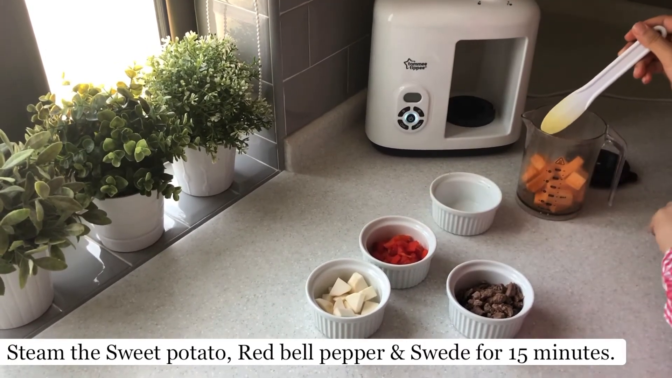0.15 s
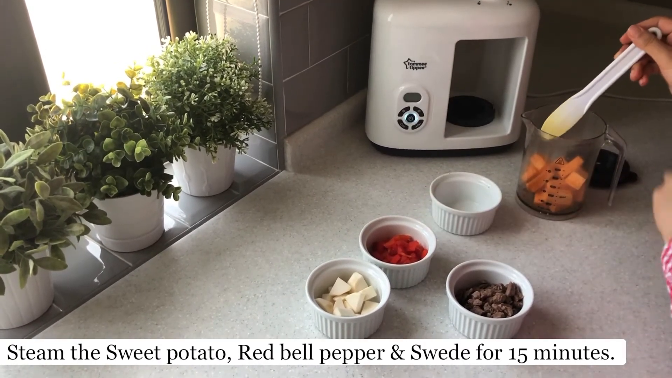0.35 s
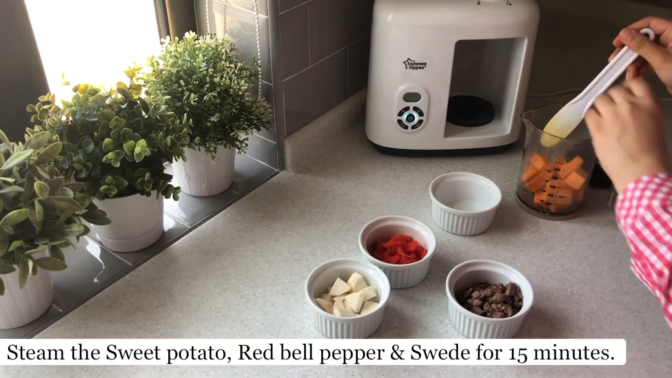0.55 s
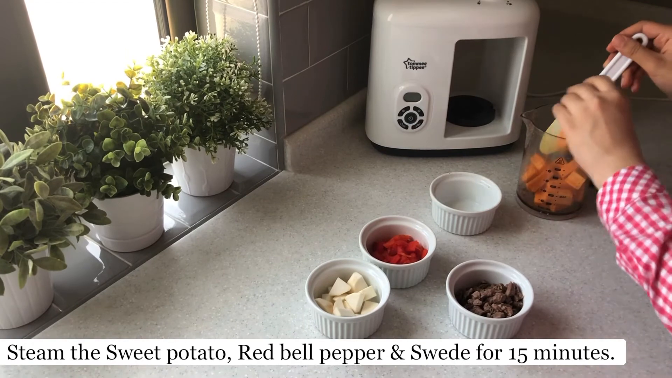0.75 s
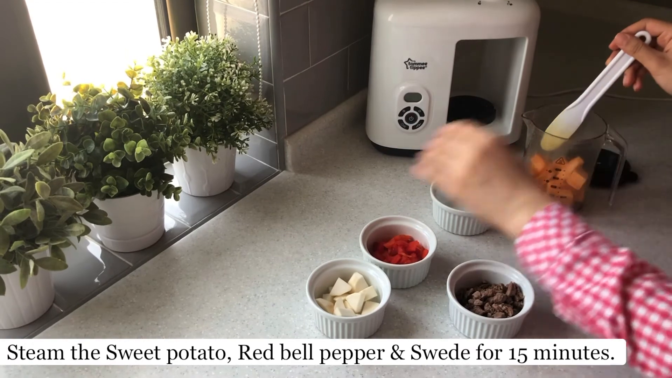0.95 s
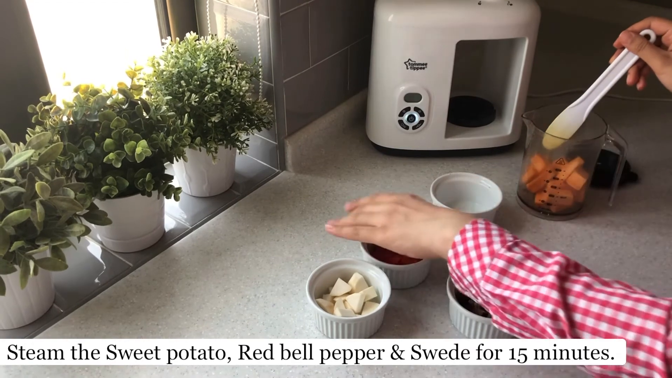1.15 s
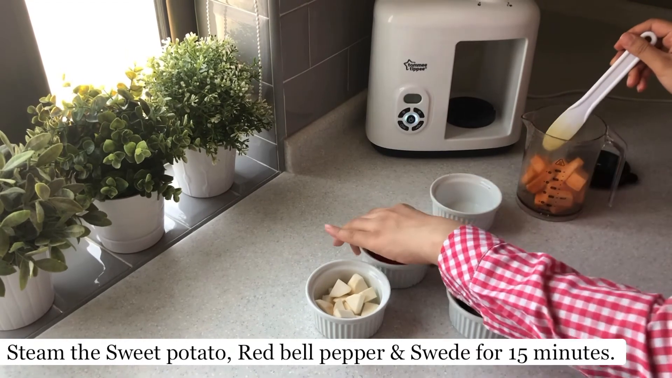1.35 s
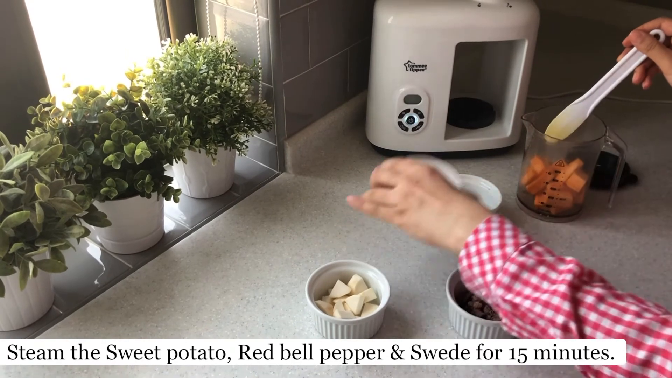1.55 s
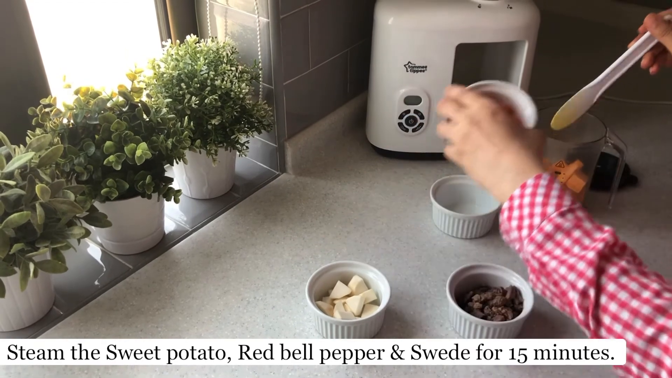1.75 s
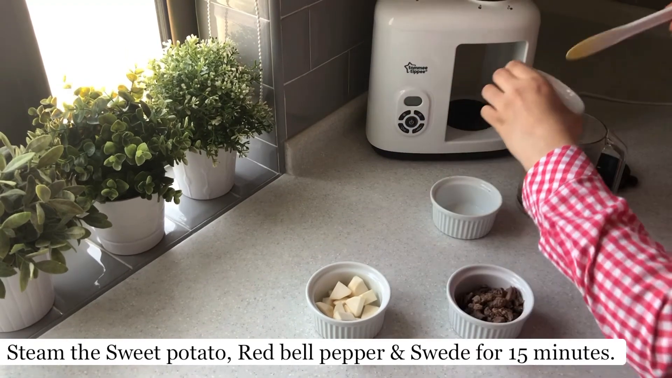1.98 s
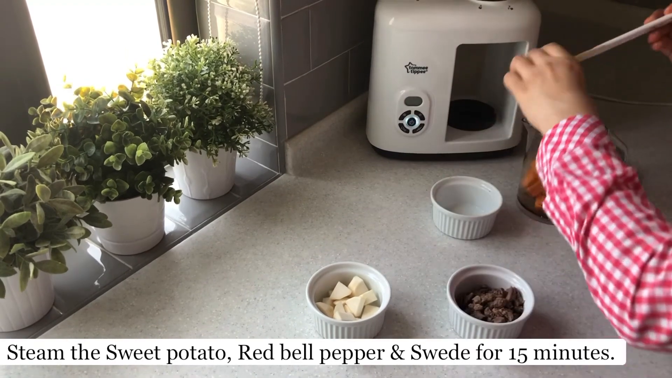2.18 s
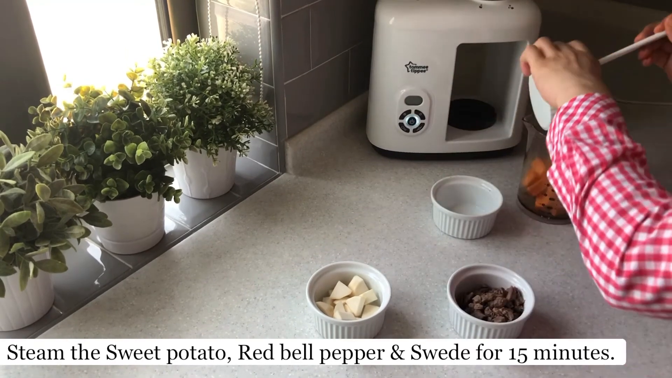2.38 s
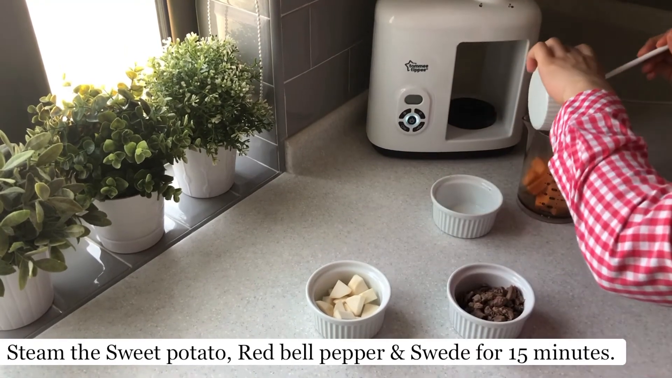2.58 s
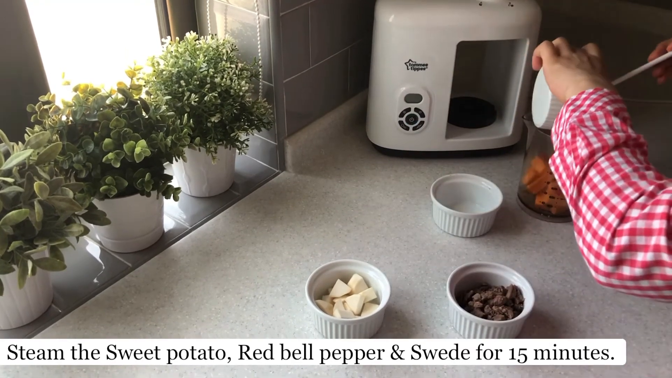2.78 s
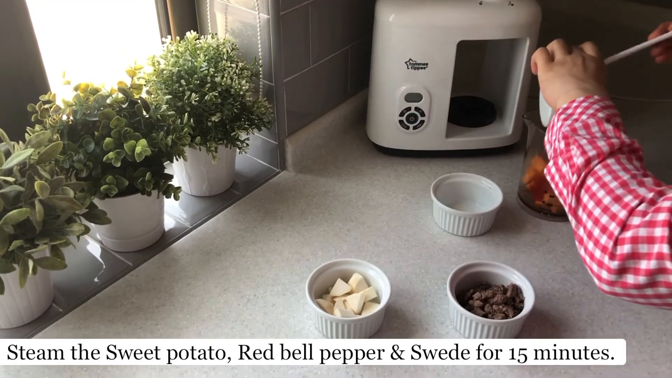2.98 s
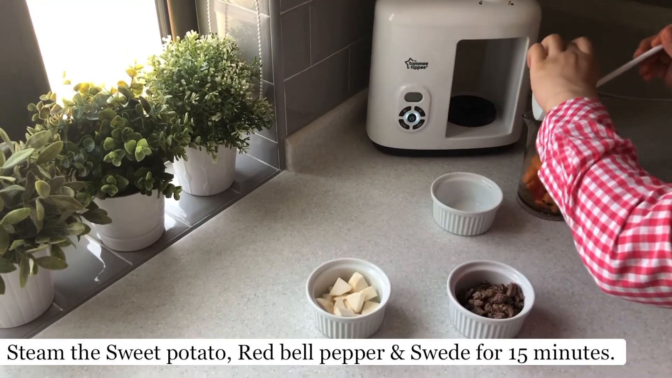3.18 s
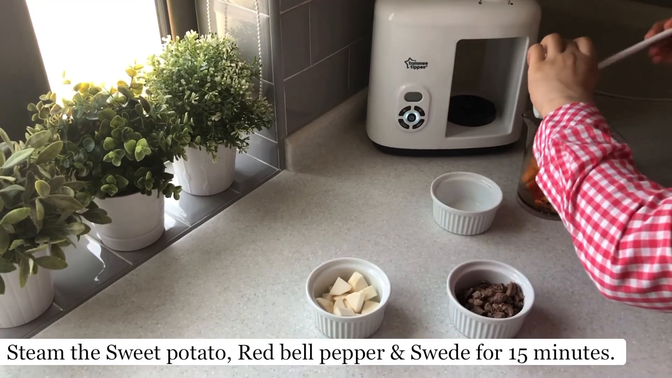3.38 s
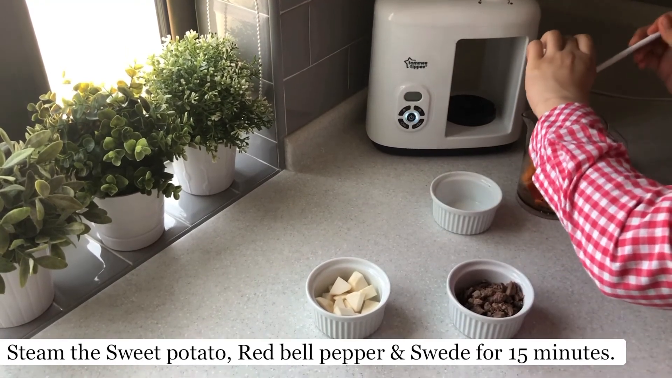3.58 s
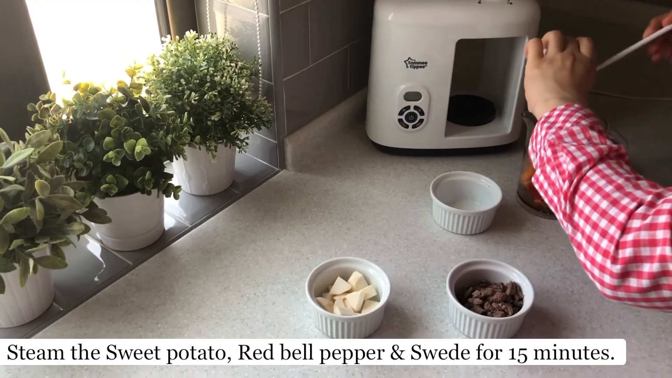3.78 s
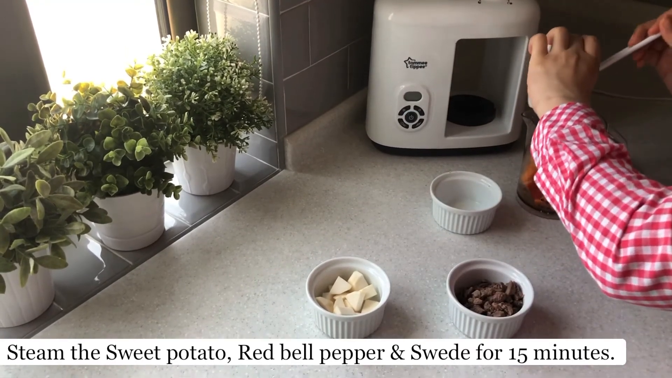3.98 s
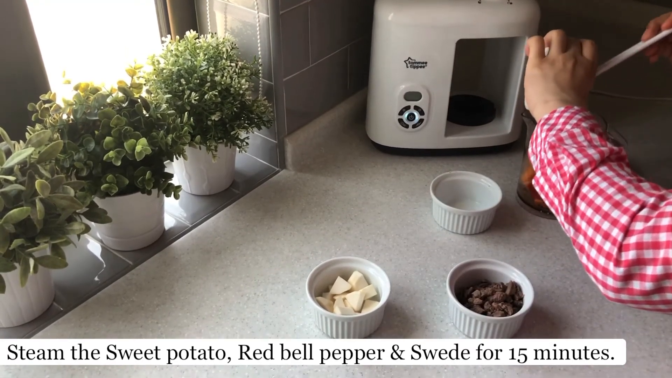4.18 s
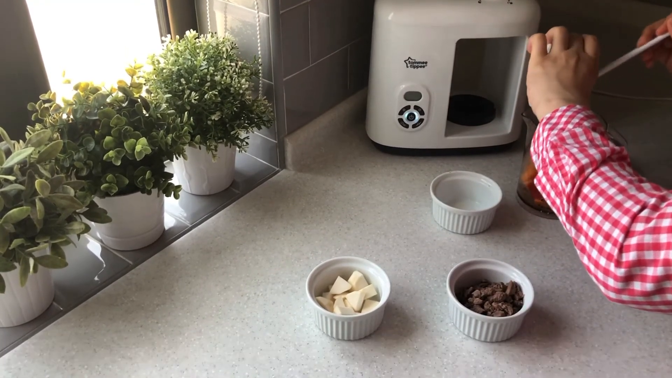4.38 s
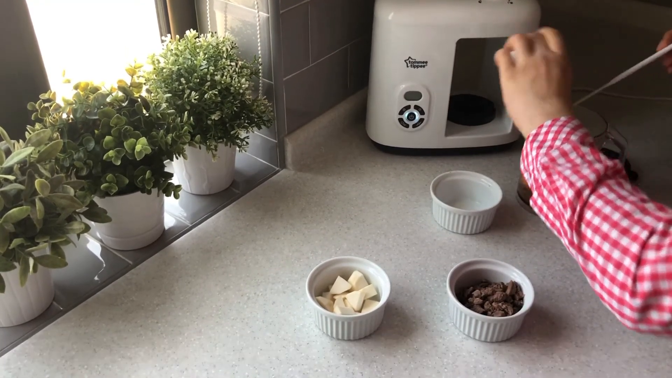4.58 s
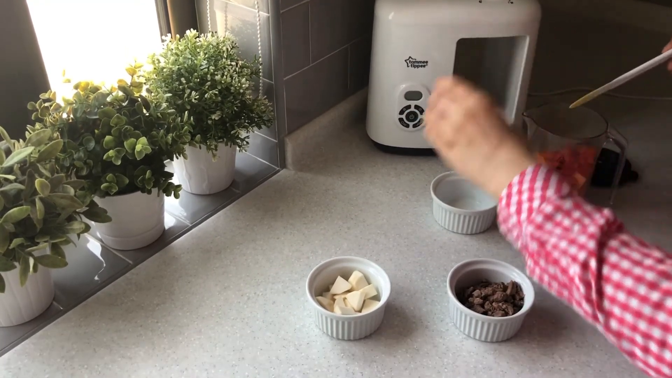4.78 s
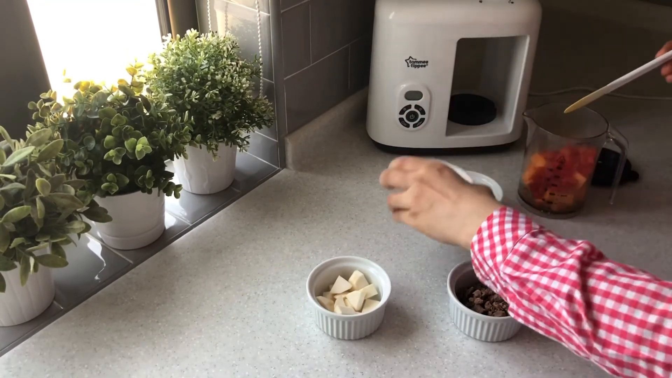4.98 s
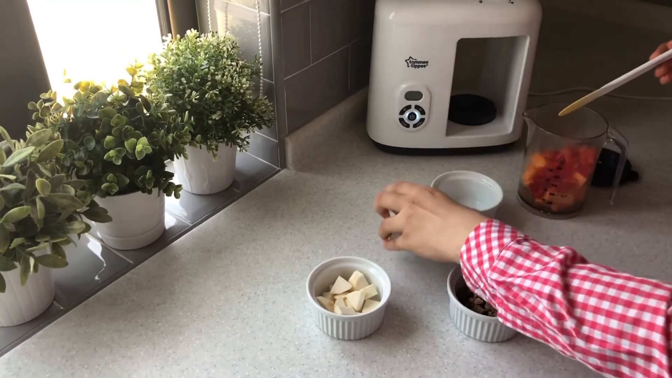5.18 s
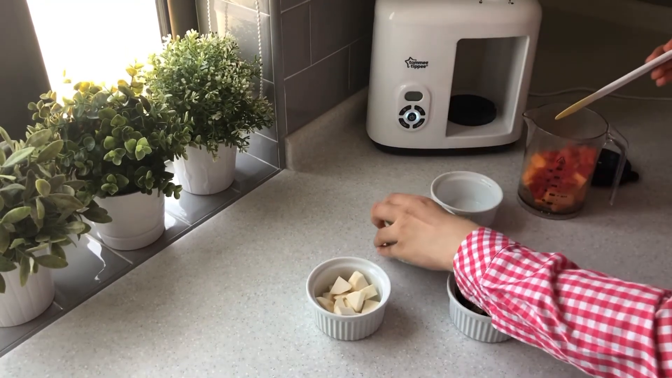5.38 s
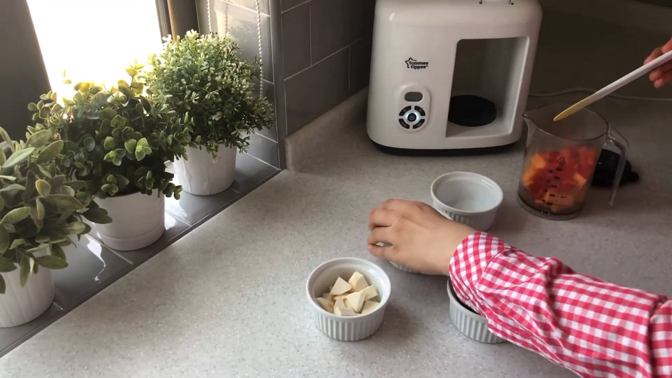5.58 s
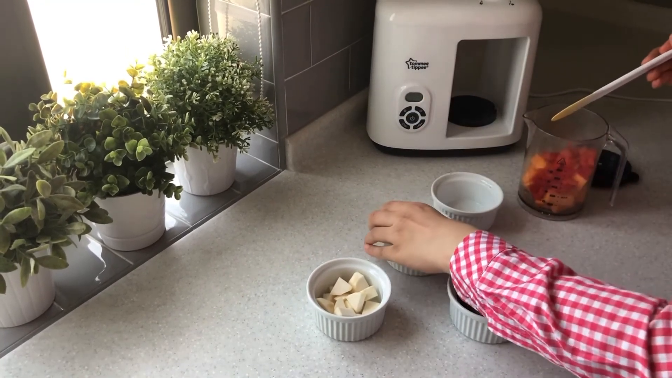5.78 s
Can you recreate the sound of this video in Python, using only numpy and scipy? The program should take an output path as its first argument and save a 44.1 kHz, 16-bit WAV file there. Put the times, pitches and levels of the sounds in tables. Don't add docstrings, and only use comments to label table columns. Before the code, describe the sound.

Sparse dull knocks, light clinks and spatula taps over a faint motor hum, ending with a sharp double clack of ceramic set down.

```python
import sys
import numpy as np
from scipy import signal
from scipy.fft import rfft, irfft
from scipy.io import wavfile
from scipy.ndimage import uniform_filter1d

SR = 44100
rng = np.random.default_rng(int(sys.argv[2]) if len(sys.argv) > 2 else 0)


def transcribe(u):
    v = np.clip(np.atleast_2d(u).T, -1, 1)
    q = np.round(v * 32767).astype(np.int16)
    wavfile.write(sys.argv[1], SR, q)


def to_linear_factor(level_db):
    exponent = np.asarray(level_db, float) / 20
    return 10 ** exponent


N = 257981

# start in seconds, body level in dB, edge level in dB,
# t60 of the bowl air in seconds.
TOUCHES = [(0.7433, -40.5, -47.5, 0.0017), (1.301, -45, -49.5, 0.014), (2.2784, -45.5, -53.5, 0.012),
           (2.469, -44, -63, .012), (2.652, -41.5, -54, 0.017), (2.78, -46, -47.5, 0.0099),
           (2.948, -41, -58, 0.0096), (3.209, -48.5, -58, .012), (3.404, -45.5, -56, 0.0074),
           (3.56, -50.5, -67, 0.0099), (3.806, -47, -60, 0.0077), (4.157, -60, -54, .008),
           (4.2255, -48, -51, 0.021)]
# start in seconds, slap level in dB, jar base level in dB, counter level in dB.
HEAVY_BUMPS = [
    (.737, -42, -43, -47),
    (1.3037, -33.5, -44.5, -54),
    (2.2792, -35, -61, -65),
    (2.472, -48, -34.5, -38),
    (2.667, -59, -42, -44),
    (5.396, -55, -39.5, -37),
    (5.602, -55, -41.5, -50),
]
# start in seconds, ring level in dB, hardness in dB per octave,
# crack level in dB, sheen level in dB.
SPATULA_TAPS = [
    (2.9501, -57, -1, -37, -46.5),
    (3.4036, -56.5, -1.5, -43.5, -51),
    (3.5608, -78.5, .3, -39, -36),
    (3.8077, -53.5, 3.5, -41.5, -38),
]
BODY_HZ, CONTACT_S = 1466, 0.0055


def at_hz(points, hz):
    table_hz, value = np.transpose(points)
    return np.interp(np.log(hz), np.log(table_hz), value)


def rms_one(x):
    return x / np.sqrt(np.mean(x ** 2) + 1e-20)


def band(x, low_hz, high_hz):
    sos = signal.butter(2, [low_hz, min(high_hz, 0.45 * SR)], "band", fs=SR, output="sos")
    return signal.sosfilt(sos, x)


def ring(x, hz, t60_s):
    r = to_linear_factor(-60 / (max(t60_s, 0.002) * SR))
    w = 2 * np.pi * hz / SR
    return signal.lfilter([0, np.sin(w)], [1, -2 * r * np.cos(w), r * r], x + 1e-18)


def narrow(hz, width_hz):
    return rms_one(ring(rng.standard_normal(N + SR), hz, 6.0 / max(width_hz, 0.5))[SR:])


def add(out, start_s, piece):
    start = round(start_s * SR)
    out[start:start + len(piece)] += piece[:N - start]


def bursts(rows, spray_share):
    out = np.zeros(N)
    t = np.arange(SR // 8) / SR
    spray = rng.standard_normal((len(rows), len(t)))
    for (start_s, peak_db, hz, octaves, length_s), noise in zip(rows, spray):
        age = t / max(length_s, 2e-4)
        force = spray_share * noise * np.exp(-2 * age) * np.tanh(1.52 * age)
        force[0] = 1 - spray_share
        edges_hz = hz * 2 ** (-octaves / 2), hz * 2 ** (octaves / 2)
        piece = band(band(force, *edges_hz), *edges_hz)
        add(out, start_s, to_linear_factor(peak_db) * piece / np.abs(piece).max())
    return out


def knocks(rows):
    out = np.zeros(N)
    for start_s, peak_db, hz, t60_s in rows:
        push = np.zeros(SR // 4)
        push_len = int(SR / hz / 2)
        push[:push_len] = np.hanning(push_len)
        piece = ring(push, hz, t60_s)
        add(out, start_s, to_linear_factor(peak_db + 1.5) * piece / np.abs(piece).max())
    return out


def contacts():
    # start in seconds, peak level in dB.
    nicks = [
        (.6294, -56),
        (0.7362, -45),
        (2.4625, -46.5),
        (3.1158, -55),
        (3.281, -50.5),
        (4.2692, -51),
    ]
    edge_hz, edge_octaves = 3370, 1.08
    body_lag_s = 0.001528
    rows = [(s, edge_db, edge_hz, edge_octaves) for s, _, edge_db, _ in TOUCHES]
    rows += [(s, db, edge_hz, edge_octaves) for s, db in nicks]
    rows += [(s + body_lag_s, body_db, BODY_HZ, 1.68) for s, body_db, _, _ in TOUCHES]
    rows += [(s, slap_db, 1265, 0.85) for s, slap_db, _, _ in HEAVY_BUMPS]
    for s, _, _, crack_db, sheen_db in SPATULA_TAPS:
        rows.append((s, crack_db, edge_hz, 1.6))
        rows.append((s, sheen_db, 7840, 1.35))
        rows.append((s, sheen_db - 1, 13700, 1))
    bowl = knocks([(s + body_lag_s, body_db + 2.4, 1450, t60_s) for s, body_db, _, t60_s in TOUCHES])
    return bursts([row + (CONTACT_S,) for row in rows], spray_share=0.23) + bowl


def set_down():
    # start in seconds, peak level in dB, hardness in dB per octave,
    # bowl level in dB.
    landings = [
        (5.3949, -12, -1, -21.5),
        (5.599, -15.5, 2.5, -20),
    ]
    # delay in seconds, level in dB, centre in Hz, width in octaves.
    rocking = [(0.00085, -1.5, 1556, 0.78), (.0001, -5, 2800, 0.9), (.0035, -5.5, 2310, 0.55),
               (0.00294, -12.5, 830, 1.36), (.008, -7, 1420, 1.07), (0.0051, -9, 656, 1.7),
               (0.00463, -18, 383, 0.77), (.0001, -18.5, 4800, 0.72), (0.019, -31, 2500, 0.77),
               (.022, -14.5, 1570, 0.83)]
    sides = 3
    rows = []
    for s, peak_db, hardness, _ in landings:
        for lag_s, rock_db, hz, octaves in rocking:
            db = peak_db + rock_db + hardness * np.log2(hz / BODY_HZ)
            rows.append((s + lag_s, db, hz, octaves, CONTACT_S))
    bowl = knocks([(s + 0.001965, bowl_db, 1436, 0.017) for s, _, _, bowl_db in landings])
    return [bursts(rows[side::sides], spray_share=0.13) for side in range(sides)] + [bowl]


def dish(hits, modes, damped_db):
    out = np.zeros((2, N))
    start_s, hit_db, hardness = np.transpose(hits)[:3]
    for hz, mode_db, t60_s in modes:
        octaves_up = np.log2(hz / modes[0][0])
        clicks = np.zeros(N)
        clicks[np.round(start_s * SR).astype(int)] = to_linear_factor(hit_db + mode_db + hardness * octaves_up - 2.5)
        pair = ring(clicks, hz * 0.999, t60_s) + 1.8 * ring(clicks, hz * 1.002, t60_s)
        damped = to_linear_factor(damped_db) * ring(clicks, hz * 0.985, 36 / hz)
        out += band([pair, damped], hz * 0.74, hz * 1.018)
    return out


def free_dish():
    # start in seconds, level in dB, hardness in dB per octave.
    hits = [
        (1.306, -50.5, -17),
        (2.463, -44.5, -11),
        (3.212, -63.5, -8),
        (4.159, -64, -8),
        (4.227, -45, -6.5),
        (5.396, -36, -4),
        (5.6, -27.5, -.3),
    ]
    # mode in Hz, level in dB, t60 in seconds.
    modes = [(2719, -3, 0.094), (6178, -22.5, 0.22), (6890, -24.5, 0.13), (10920, -42, .23),
             (13780, -36, .05)]
    return dish(hits, modes, damped_db=-9.0)


def held_dish():
    # mode in Hz, level in dB, t60 in seconds.
    modes = [(2894, -7.5, 0.1), (4620, -8, .008), (6190, 0.2, .22), (11000, -14, 0.18), (13760, -26, .04)]
    return dish(SPATULA_TAPS, modes, damped_db=21.5)


def jar():
    # start in seconds, peak level in dB, pitch in Hz.
    hollow_knocks = [(.738, -34.5, 641), (.744, -38, 640), (.75, -45, 606), (.785, -42, 570),
                     (1.303, -36, 562), (1.308, -42, 670), (1.32, -42.5, 415), (2.288, -46.5, 456),
                     (2.284, -43.5, 840), (2.47, -38, 510), (2.474, -40.5, 750), (2.476, -38.5, 350),
                     (2.658, -43, 1027), (2.66, -41.5, 507), (2.692, -40.5, 486), (2.785, -42, 498),
                     (2.99, -48.5, 550), (3.215, -45.5, 527), (3.812, -52, 470), (4.162, -64, 594)]
    rows = [(s, db, hz, 0.041) for s, db, hz in hollow_knocks]
    rows += [(s + 0.00412, body_db - 5.5, 1010, 0.024) for s, body_db, _, _ in TOUCHES]
    rows += [(s, base_db, 228.3, 0.13) for s, _, base_db, _ in HEAVY_BUMPS]
    rows += [(s + 0.0105, counter_db, 114.5, 0.19) for s, _, _, counter_db in HEAVY_BUMPS]
    return knocks(rows)


def slides():
    # start in seconds, peak level in dB, centre in Hz, width in octaves, length in seconds.
    slips = [
        (1.283, -45.5, 1300, 1.57, 0.035),
        (2.63, -58, 1200, 1.1, .03),
        (2.70, -66, 4180, 0.44, 0.047),
        (5.35, -64.5, 2700, 0.41, .08),
    ]
    return bursts(slips, spray_share=1.0)


def food_ticks():
    # start in seconds, peak level in dB.
    ticks = [
        (.3344, -67),
        (.739, -55),
        (1.5194, -72),
        (2.678, -55.5),
        (2.82, -68),
        (3.1158, -65),
        (3.255, -60.5),
        (3.6905, -64),
        (5.3941, -60),
        (5.599, -50.5),
    ]
    return bursts([(s, db, 12650, 3.1, 0.0046) for s, db in ticks], spray_share=0.97)


def rubs():
    # start in seconds, end in seconds, pitch in Hz, width in Hz, level in dB.
    strokes = [
        (1.127, 1.316, 7000, 15, -81),
        (1.134, 1.232, 2690, 15, -79),
        (1.543, 1.868, 2340, 37, -77),
        (1.663, 1.803, 1690, 25, -75),
    ]
    t = np.arange(N) / SR
    out = np.zeros(N)
    for start_s, end_s, hz, width_hz, db in strokes:
        progress = np.clip((t - start_s) / (end_s - start_s), 0, 1)
        out += to_linear_factor(db) * narrow(hz, width_hz) * np.sin(np.pi * progress) ** 0.41
    return out


def kitchen(x):
    # frequency in Hz, t60 in seconds.
    room_t60 = [(100, 0.45), (400, 0.59), (1500, 0.54), (2700, 0.43), (4500, 0.36), (8000, 0.51),
                (16000, 0.25)]
    # delay in seconds, level in dB.
    echoes = [(.0024, -22.5), (.0085, -13.5), (.0195, -20), (.029, -28.5)]
    t = np.arange(int(0.7 * SR)) / SR
    edges_hz = 60 * 2 ** np.arange(0, 8.3, 0.25)
    white = rng.standard_normal((2, len(t)))
    tail = np.zeros(len(t))
    for k, (low_hz, high_hz) in enumerate(zip(edges_hz, edges_hz[1:])):
        t60_s = at_hz(room_t60, np.sqrt(low_hz * high_hz))
        tail += band(white[k % 2], low_hz, high_hz) * to_linear_factor(-60 * t / t60_s)
    tail = tail * (1 - np.exp(-(t / 0.0037) ** 2))
    lines = rfft(tail)
    hz = np.fft.rfftfreq(len(t), 1 / SR) + 1
    smooth = uniform_filter1d(np.abs(lines) ** 2, size=int(118 * len(t) / SR))
    low_cut = 1 - np.exp(-(hz / 80) ** 4)
    tail = irfft(lines * np.sqrt(at_hz(room_t60, hz) / smooth) * low_cut, len(t))
    response = to_linear_factor(-2.5) * tail / np.sqrt(np.sum(tail ** 2))
    for k, (delay_s, db) in enumerate(echoes):
        response[round(delay_s * SR)] += to_linear_factor(db) * (-1) ** k
    return signal.fftconvolve(x, response)[:N]


def sleeves():
    # time in seconds, motion in dB.
    motion = [(0, 3), (.3, -1), (.5, 5.5), (1.05, 3.5), (1.3, 0.5), (1.9, -1), (2.2, 4.5), (2.7, 3),
              (2.9, -3), (3.45, -5), (3.85, -9), (4.25, -4.5), (4.65, 3.5), (4.95, -5.5), (5.85, -1.5)]
    motion_db = np.interp(np.arange(N) / SR, *np.transpose(motion))
    motion_db = motion_db - motion_db.mean()
    cloth = to_linear_factor(-77 + 0.37 * motion_db) * rms_one(band(rng.standard_normal(N), 1400, 4850))
    fine = to_linear_factor(-85 + motion_db) * rms_one(band(rng.standard_normal(N), 4000, 17000))
    return cloth + fine


def appliance():
    # frequency in Hz, width in Hz, level in dB.
    hum_lines = [(95, 2.74, -55.5), (56.2, 4.7, -67), (118.4, 2.9, -69.5), (231.4, 14, -65.5),
                 (474, 5.7, -69.5)]
    motor_hz, wobble_hz, motor_db = hum_lines[0]
    wander = rms_one(uniform_filter1d(rng.standard_normal(N), size=4000))
    pace_hz = motor_hz + 0.19 * wobble_hz * wander
    hum = to_linear_factor(motor_db) * np.sqrt(2) * np.sin(2 * np.pi * np.cumsum(pace_hz) / SR)
    for hz, width_hz, db in hum_lines[1:]:
        hum = hum + to_linear_factor(db) * narrow(hz, width_hz)
    return hum


def room_air():
    # frequency in Hz, density in dB per Hz.
    air_spectrum = [(27, -56), (44, 2), (210, -2.5), (500, -9.5), (1000, -22), (3200, -33.5), (6300, -37),
                    (16000, -44)]
    hz = np.maximum(np.fft.rfftfreq(N, 1 / SR), 1)
    air = rms_one(irfft(rfft(rng.standard_normal(N)) * to_linear_factor(at_hz(air_spectrum, hz)), N))
    t = np.arange(N) / SR
    rumble = to_linear_factor(-66.5 - 0.82 * t) * rms_one(band(rng.standard_normal(N), 317, 890))
    return to_linear_factor(-59) * air + rumble


def scene():
    rings, damped = free_dish() + held_dish()
    hits = [contacts(), food_ticks() + slides() + damped] + set_down()
    hollow = jar()
    room = sum(kitchen(x) for x in hits) + kitchen(to_linear_factor(-6) * rings + to_linear_factor(-2) * hollow)
    background = sleeves() + appliance() + room_air()
    return (sum(hits) + rings + hollow + room + rubs() + background)[None]


def top_cut(x):
    return signal.sosfilt(signal.butter(12, 16540, fs=SR, output="sos"), x)


def record(dry):
    cut = signal.sosfilt(signal.cheby2(10, 50, 16850, fs=SR, output="sos"), dry)
    return top_cut(cut)


dry = scene()
out = record(dry)
transcribe(out)
```